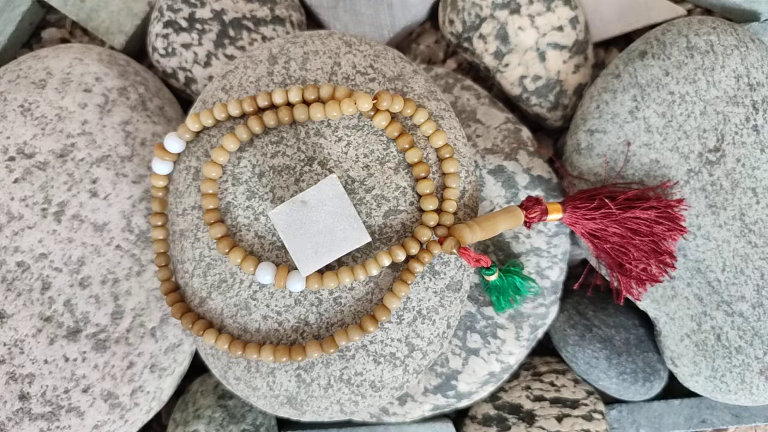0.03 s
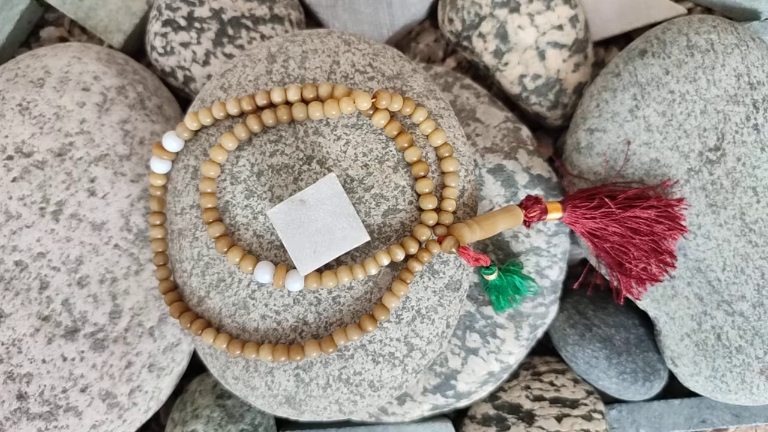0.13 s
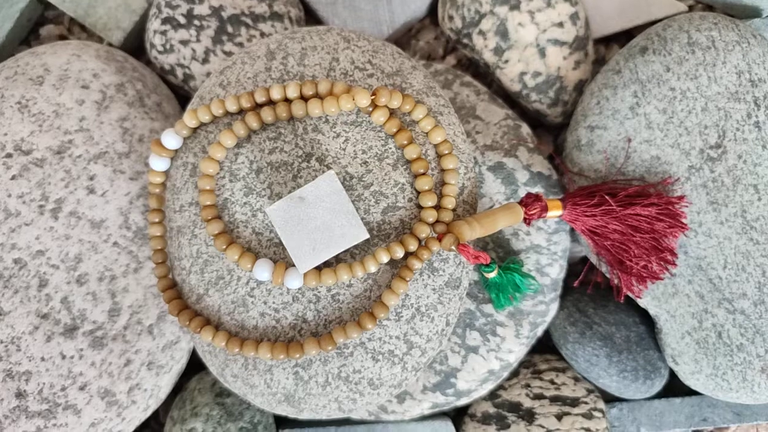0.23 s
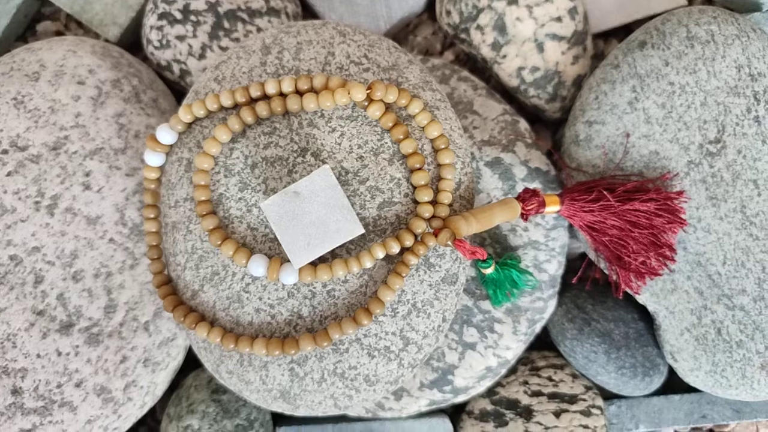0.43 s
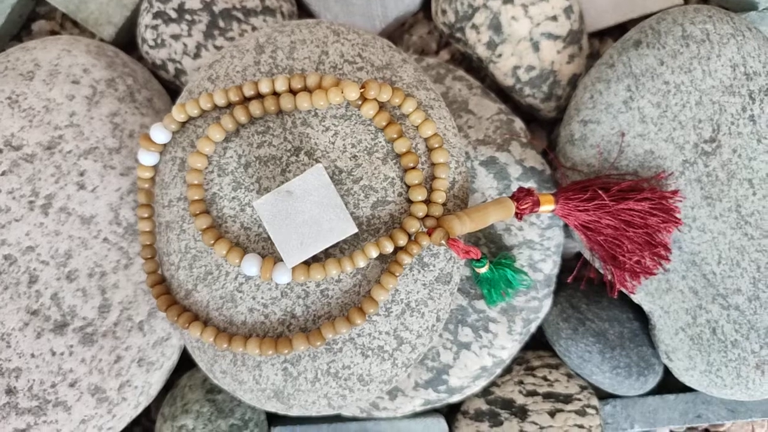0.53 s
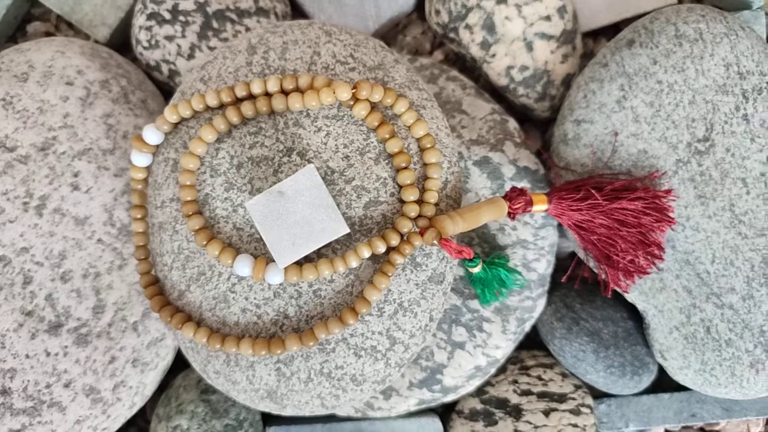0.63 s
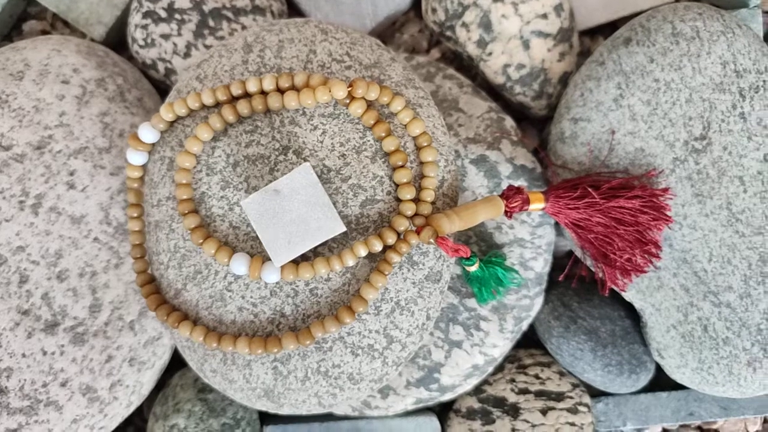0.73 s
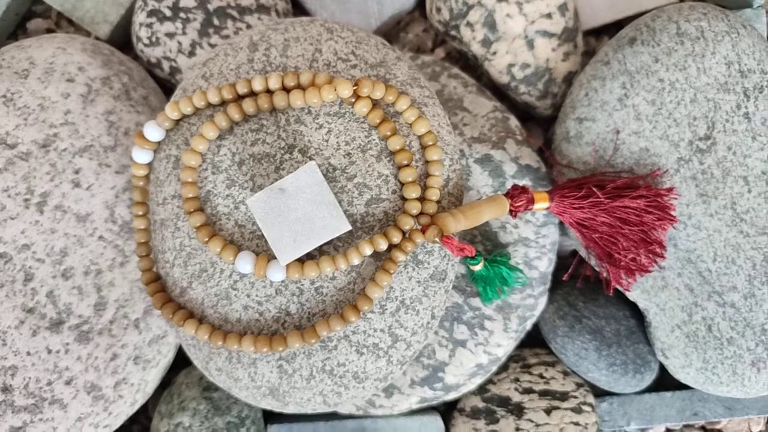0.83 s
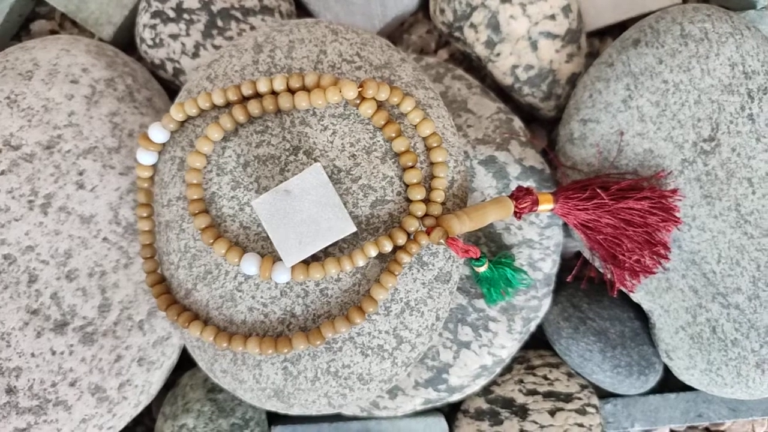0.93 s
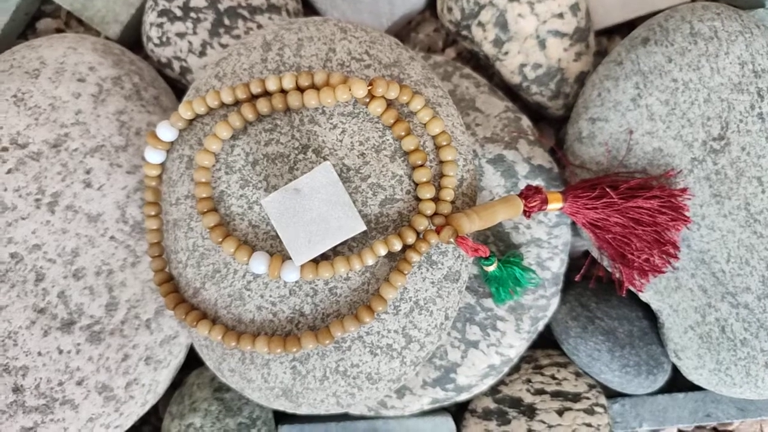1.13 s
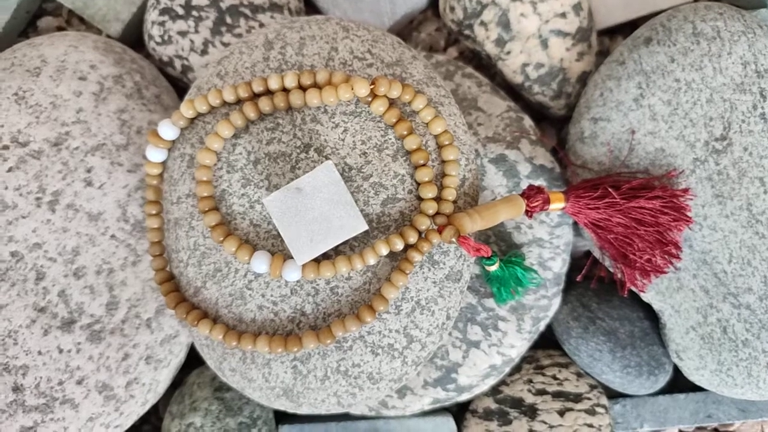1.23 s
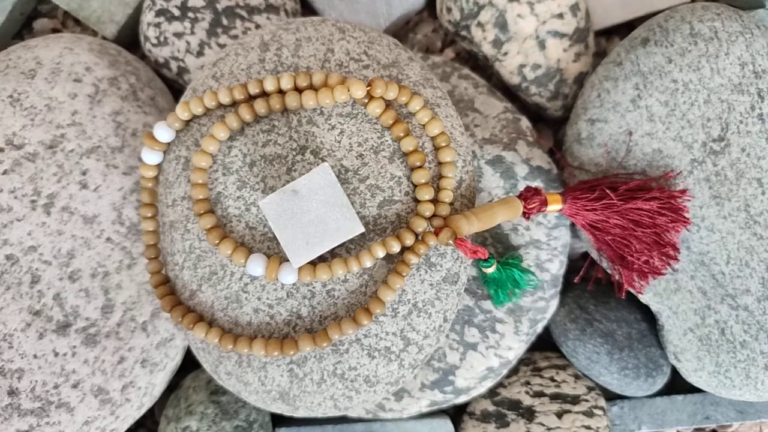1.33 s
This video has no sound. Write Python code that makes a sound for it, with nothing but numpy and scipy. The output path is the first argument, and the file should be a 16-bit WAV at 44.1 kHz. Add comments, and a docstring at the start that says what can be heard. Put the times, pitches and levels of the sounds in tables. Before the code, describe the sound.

Far traffic rumbles and hums in the open air, fading in with several short clicks.

```python
"""Distant traffic outdoors

Far engines drone under a wide wash of tyre noise, heard by two spaced microphones. The wash is shaped
noise and the drone is a set of wavering tones. The sound fades in as the recorder starts, with a faint,
short whine. The right channel's offset (its resting level) sags and is stepped at even intervals,
which makes a few dry clicks. Tiny crackles follow."""
import sys
import numpy as np
from scipy import signal
from scipy.fft import rfft, irfft
from scipy.io import wavfile
from scipy.ndimage import uniform_filter1d

SR = 44100
rng = np.random.default_rng(int(sys.argv[2]) if len(sys.argv) > 2 else 0)


def output_pcm(signal):
    """Save a mono or channel-first signal as 16-bit PCM at the path in sys.argv[1].

    Samples are clipped to [-1, 1] before scaling.
    """
    pcm = np.clip(np.atleast_2d(signal).T, -1, 1) * 32767
    wavfile.write(sys.argv[1], SR, np.round(pcm).astype(np.int16))


N = 61739
TIME = np.arange(N) / SR
START_S = 0.1246  # silent until here

# How strong the tyre noise is from low to high (frequency [Hz], relative level [dB])
TYRE_SPECTRUM = [(15, -18), (25, 1), (33, -7), (70, -4), (92, -9), (125, -4), (200, -8), (240, -13),
                 (295, -10.5), (410, -18), (460, -15.5), (1030, -19.5), (1340, -20.5), (2000, -22.5),
                 (2500, -24.5), (3200, -31.5), (5200, -42.5), (7400, -44.5), (8900, -58.5), (11500, -60),
                 (12600, -58.5), (14200, -65.5)]
# Which side the tyre noise leans to (frequency [Hz], left minus right [dB])
TYRE_BALANCE = [(60, 0.5), (110, -2.5), (200, 1), (380, 0.5), (690, -0.5), (1270, -4.5), (2340, -7.5),
                (4320, -6.5), (7950, -6), (14600, -7.0)]
# Swells in the treble of the tyre noise (time [s], boost [dB])
TREBLE_SWELLS = [(.15, -0.5), (.36, 2), (.55, 0), (.8, 1.5), (1.0, 5), (1.15, 4.6), (1.3, 2.5), (1.4, 3.5)]
# Swells in its bass (time [s], boost [dB])
BASS_SWELLS = [(.15, -1.5), (.26, 3.5), (.42, -1), (.62, 4.5), (.8, 1.5), (1.0, 2), (1.15, 2.5), (1.4, 2.5)]
# Engine tones before the fade-in (pitch [Hz], top level [dB], peak time [s], time to fall to 37% [s])
ENGINE_TONES = [(40, -50.5, 1.2, 1.3), (70.04, -44.5, 0.21, 0.98), (139, -44, 1.3, 0.12),
                (146, -50.5, 0.57, 0.17), (169, -51.5, 0.63, 0.37), (310, -57, 1.29, 0.545),
                (377.6, -54, 0.4, 0.23), (494, -65, 0.46, 0.82), (975, -65, 0.38, 0.63),
                (1031, -65.5, 1, .8), (1606, -65.5, 1.1, 1.5)]
# Tones of the whine (pitch [Hz], level before panning [dB], start [s], start of dying away [s])
WHINE_TONES = [(3570, -70, 0.13, .385), (3950, -75, 0.14, .31), (4200, -86, 0.12, 0.23)]
# Jumps in the right channel's offset, in order (size [share of full scale])
OFFSET_STEPS = [-0.036, 0.078, 0.061, 0.027]
# Tiny crackles in the right channel (time [s], level [dB])
CRACKLE_BURSTS = [(0.3044, -43.5), (.3070, -43), (.3642, -55)]


def amp(db):
    """Turns decibels into a number to multiply by."""
    return 10 ** (np.asarray(db) / 20)


def unit(x):
    """Scales a signal to an average strength (rms) of one."""
    return x / np.sqrt(np.mean(x ** 2) + 1e-20)


def curve_at(table, hz):
    """Reads between the rows of a table, on a log-frequency axis."""
    table_hz, values = np.transpose(table)
    return np.interp(np.log(hz + 1), np.log(table_hz + 1), values)


def wander(rate_hz):
    """Smooth random motion, mostly slower than rate_hz."""
    hz = np.fft.rfftfreq(4 * N, 1 / SR)
    spectrum = rfft(rng.standard_normal(4 * N))
    return unit(irfft(spectrum * np.exp(-(hz / rate_hz) ** 2)))[:N]


def wavering_tone(hz, waver_hz, flutter, rate_hz):
    """A tone whose pitch drifts by about waver_hz and whose strength flutters."""
    cycles = np.cumsum(hz + waver_hz * wander(rate_hz)) / SR + rng.random()
    strength = 1 + flutter * wander(rate_hz)
    return unit(np.sin(2 * np.pi * cycles) * strength)


def tyre_wash():
    """Tyre noise from all around: long waves reach both microphones alike, short ones do not."""
    mic_spacing_m, sound_m_per_s = 0.16, 343
    treble_hz, bass_hz = 4460, 216
    size, hop = 2048, 512  # the noise is built as spectra of short, overlapping frames
    frames, hz = N // hop + 5, np.fft.rfftfreq(size, 1 / SR)
    t = np.arange(frames)[:, None] * hop / SR
    noise = rng.standard_normal((5, frames, len(hz)))

    left = noise[0] + 1j * noise[1]
    unrelated = noise[2] + 1j * noise[3]
    likeness = 0.98 * np.sinc(2 * hz * mic_spacing_m / sound_m_per_s)
    right = likeness * left + np.sqrt(1 - likeness ** 2) * unrelated
    lean = amp(curve_at(TYRE_BALANCE, hz) / 2)
    spectra = np.array([left * lean, right / lean])
    spectra /= np.sqrt(lean ** 2 + lean ** -2 + 2 * likeness)  # keeps left plus right even

    # Random patches of time and frequency are a little louder or softer.
    slow_noise = uniform_filter1d(noise[4], size=7, axis=0)
    patches_db = 1.2 * unit(uniform_filter1d(slow_noise, size=18, axis=1))
    treble_db = np.interp(t, *np.transpose(TREBLE_SWELLS)) * hz ** 2 / (hz ** 2 + treble_hz ** 2)
    bass_db = np.interp(t, *np.transpose(BASS_SWELLS)) * np.exp(-(hz / bass_hz) ** 2 / 2)
    spectra *= amp(curve_at(TYRE_SPECTRUM, hz) + patches_db + bass_db + treble_db)
    _, wash = signal.istft(spectra.transpose(0, 2, 1), nperseg=size, noverlap=size - hop)
    wash = wash[:, :N]
    return amp(-40) * wash / np.std(wash.mean(axis=0))


def engine_drone():
    """Far engines hum in the centre; each tone swells and recedes."""
    drone = np.zeros(N)
    for hz, db, peak_s, fall_s in ENGINE_TONES:
        swell = np.exp(-((TIME - peak_s) / fall_s) ** 2)
        drone += amp(db) * swell * wavering_tone(hz, waver_hz=2.5, flutter=0.28, rate_hz=5)
    return drone


def whine():
    """Thin, high tones on the right that rise, hold and soon die away."""
    rise_s, decay_s, right_lead_db = 0.035, 0.028, 7.5
    tones = np.zeros(N)
    for hz, db, start, end in WHINE_TONES:
        rise = np.clip((TIME - start) / rise_s, 0, 1)
        decay = np.exp(-np.maximum(TIME - end, 0) / decay_s)
        tones += amp(db) * rise * decay * wavering_tone(hz, waver_hz=18, flutter=0.47, rate_hz=79)
    return tones * amp([[-right_lead_db / 2], [right_lead_db / 2]])


def jump(start_s, decay_s):
    """Leaps from zero to one, then dies away."""
    return (TIME >= start_s) * np.exp(-np.maximum(TIME - start_s, 0) / decay_s)


def offset_clicks():
    """The offset sags and slowly returns; each sudden step in it is a click."""
    sag_s, return_s, step_every_s = 0.037, 0.35, 0.06
    age = np.maximum(TIME - START_S, 0)
    sag = -0.22 * (1 - np.exp(-age / sag_s))
    offset = sag / (1 + (age / return_s) ** 3.24)
    for k, step in enumerate(OFFSET_STEPS):
        offset += step * jump(START_S + k * step_every_s, decay_s=0.026)
    return offset


def crackles():
    """Bright bursts of noise, about a millisecond each, as the clicks die out."""
    bursts = sum(amp(db) * jump(start, decay_s=0.0009) for start, db in CRACKLE_BURSTS)
    bright_band = signal.butter(4, [3270, 8400], btype="band", fs=SR, output="sos")
    return bursts * unit(signal.sosfilt(bright_band, rng.standard_normal(N)))


def scene():
    """The traffic: tyres and engines together."""
    return tyre_wash() + engine_drone()


def record(dry):
    """Fades the traffic in after silence, adds whine, clicks and crackles, and cuts the top treble."""
    fade_s, first_gain = 0.25, 0.098
    progress = np.clip((TIME - START_S) / fade_s, 0, 1)
    fade = first_gain + (1 - first_gain) * progress ** 0.85
    mix = (dry * fade + whine()) * (TIME >= START_S)
    mix[1] += offset_clicks() + crackles()  # right channel only
    low_pass = signal.firwin(255, cutoff=14350, window=("kaiser", 9), fs=SR)
    return signal.oaconvolve(mix, low_pass[None], "same")


dry = scene()
out = record(dry)
output_pcm(out)
```